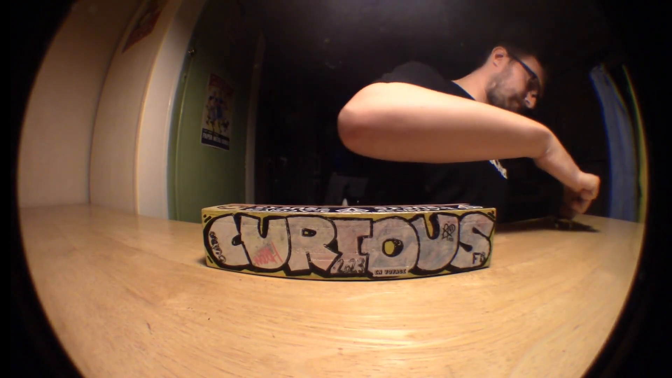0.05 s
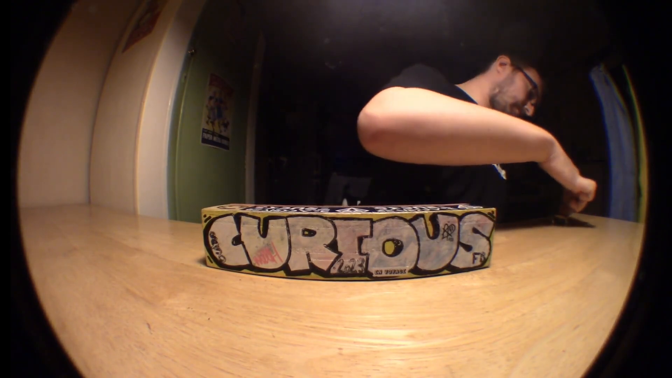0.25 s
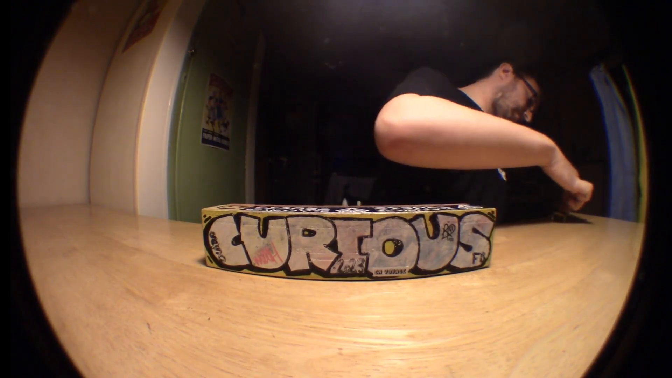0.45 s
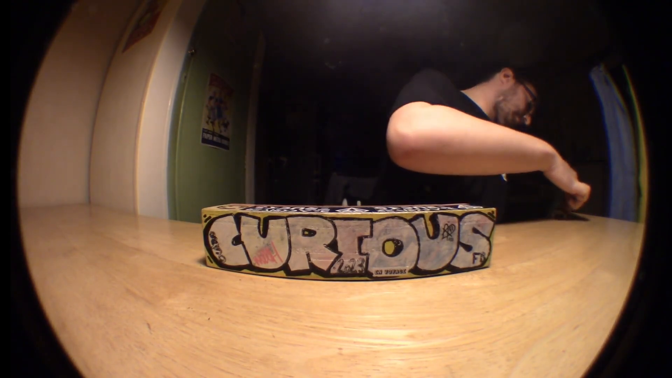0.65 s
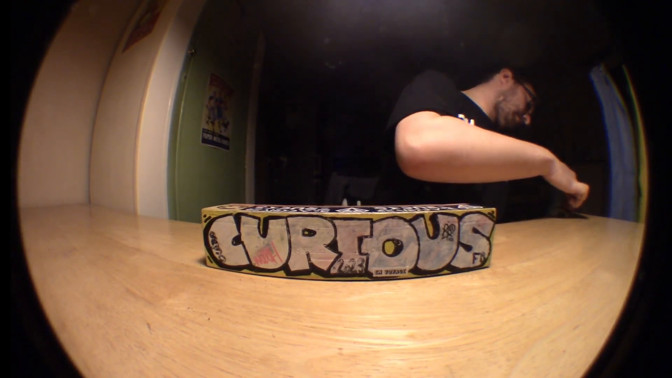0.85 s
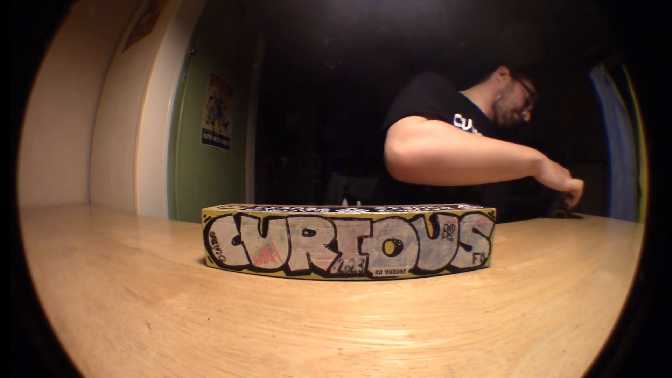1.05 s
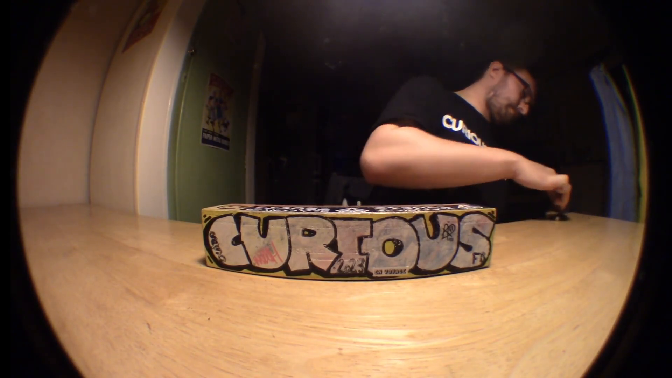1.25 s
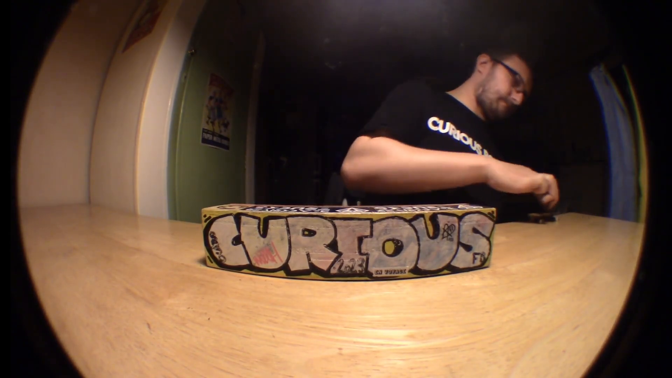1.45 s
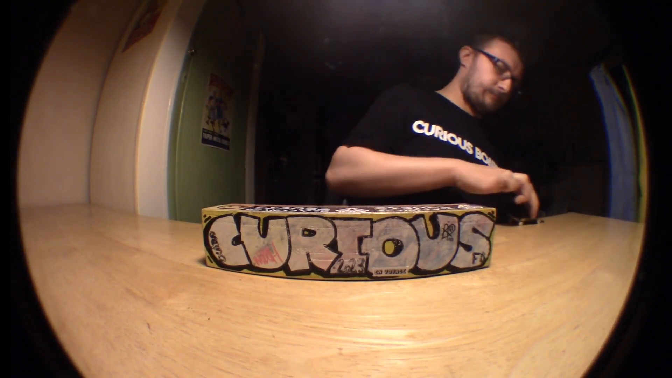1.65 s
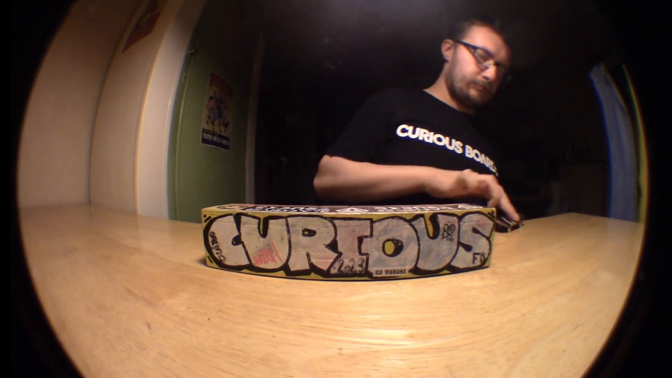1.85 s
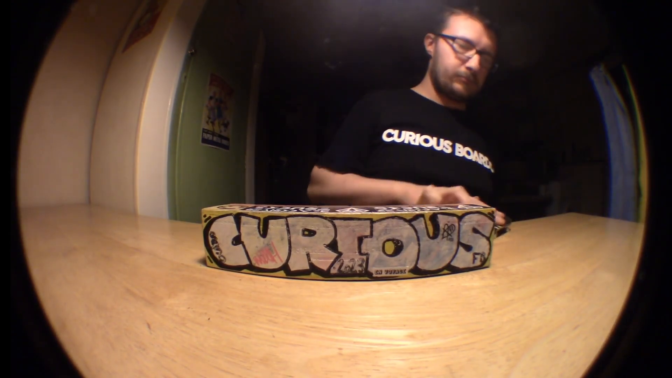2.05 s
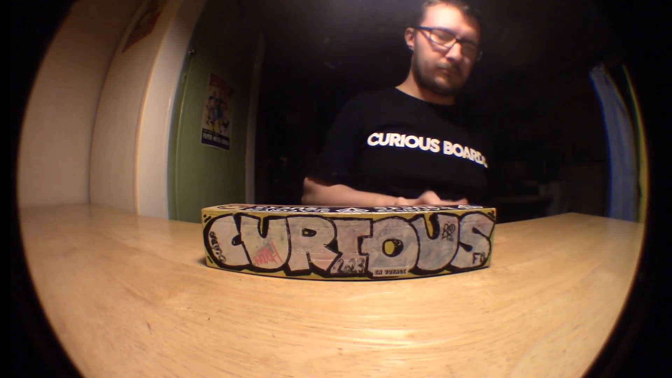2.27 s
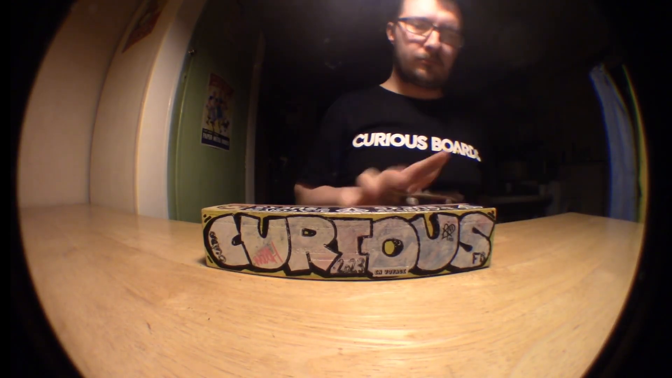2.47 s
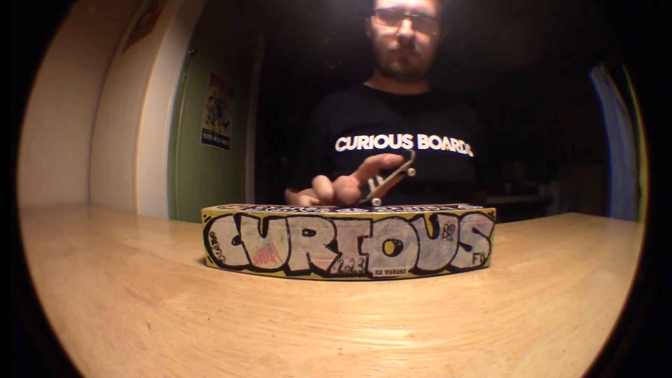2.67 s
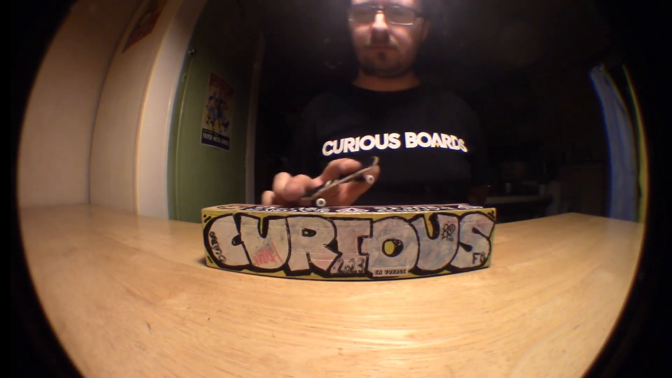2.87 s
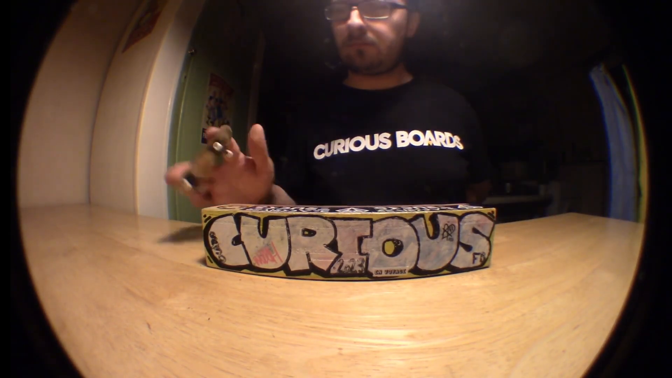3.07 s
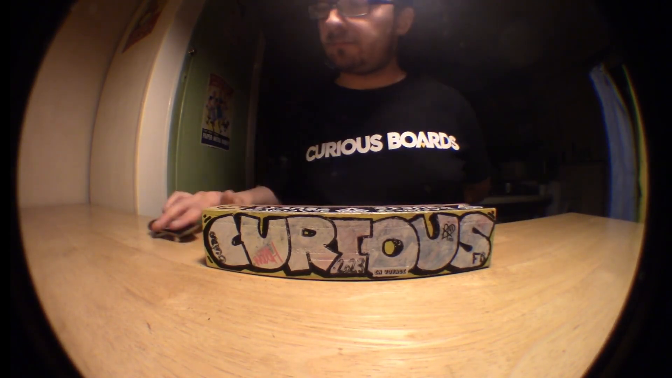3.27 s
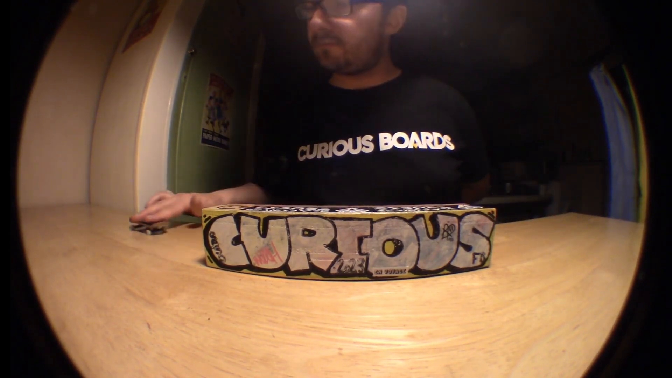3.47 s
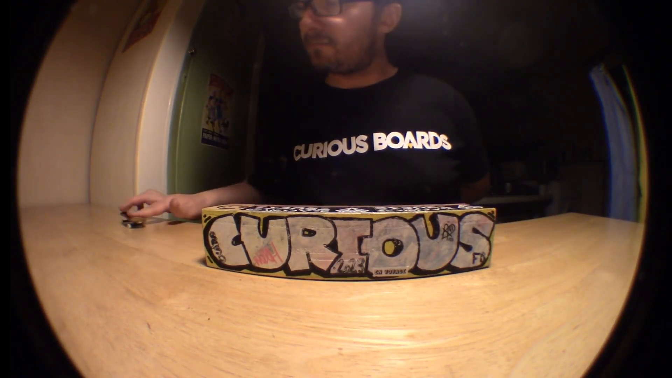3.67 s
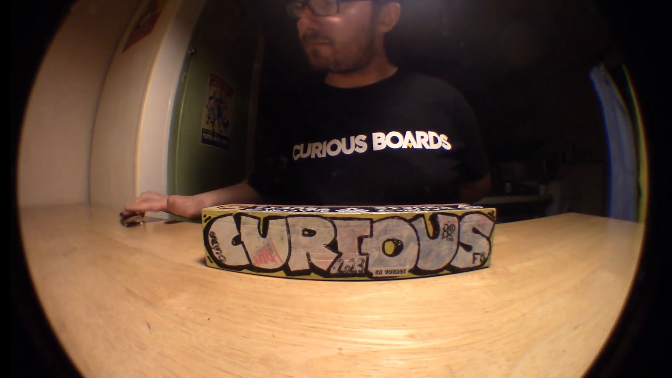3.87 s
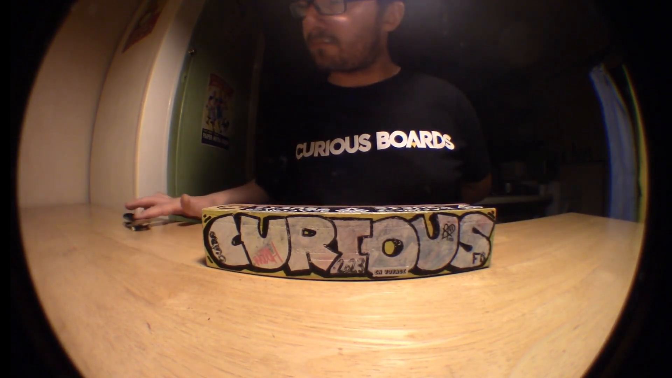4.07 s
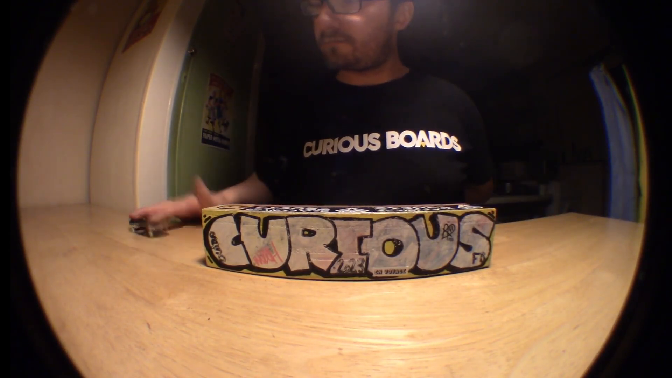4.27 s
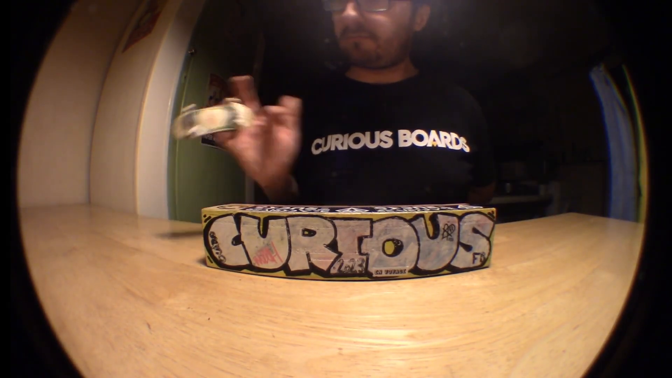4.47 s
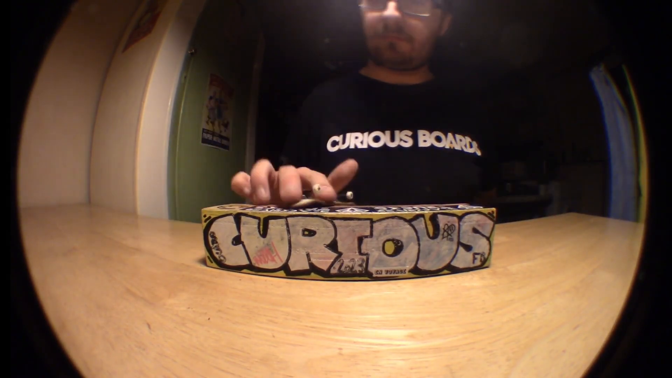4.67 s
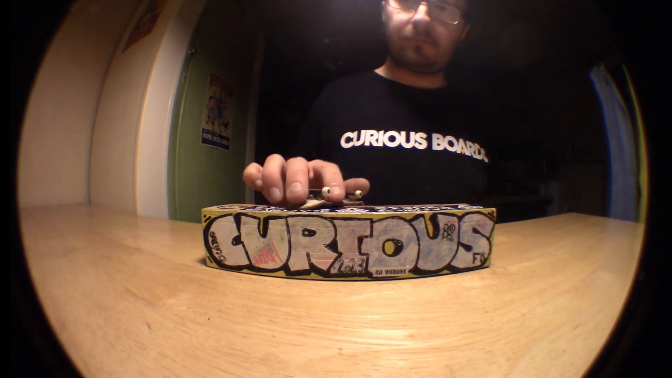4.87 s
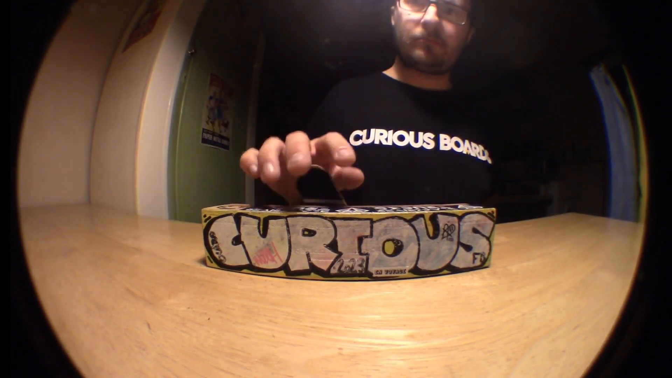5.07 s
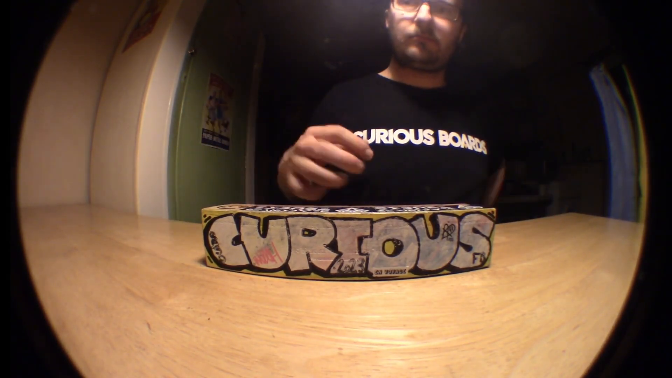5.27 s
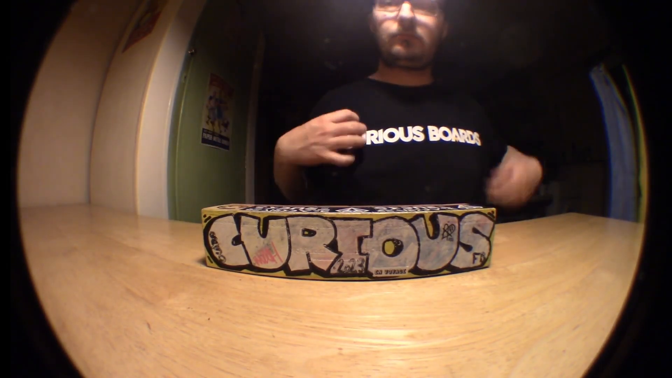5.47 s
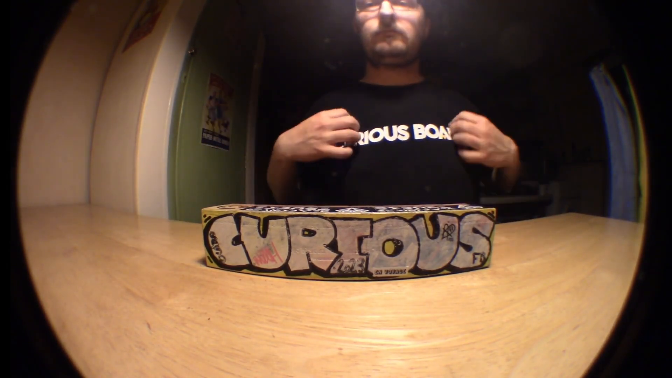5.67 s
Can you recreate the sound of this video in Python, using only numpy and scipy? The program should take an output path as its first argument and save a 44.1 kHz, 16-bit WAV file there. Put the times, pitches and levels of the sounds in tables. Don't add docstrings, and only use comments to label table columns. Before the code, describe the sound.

In a small quiet room, a finger-sized skateboard rolls across a wooden table with a low, lumpy rumble and fine wheel hiss. It pops sharply, its metal axles chatter and scrape along a hollow box, and it clacks down loudly. After brief rolling comes a second pop, a short scrape, then a drop and clattering tumble. Close camera microphone, nearly mono, loud peaks slightly clipped.

```python
import sys
import numpy as np
from scipy import signal
from scipy.fft import rfft, irfft, next_fast_len
from scipy.io import wavfile
from scipy.ndimage import map_coordinates

SR = 44100
rng = np.random.default_rng(int(sys.argv[2]) if len(sys.argv) > 2 else 0)


def nominal_scale(level):
    x = np.asarray(level, float) / 20
    return 10 ** x


def wrap_up_sound(samples):
    columns = np.atleast_2d(samples).T
    tamed = np.clip(columns, -1, 1)
    steps = np.round(tamed * 32767).astype(np.int16)
    wavfile.write(sys.argv[1], SR, steps)


N = 252693

# pitch_hz, width_hz, level_db
TABLE = [(160, 45, -6.5), (225, 114, -12.5), (330, 20, -4.5), (423, 31, -7), (506.4, 13.3, 2.5),
         (603, 8.6, -3.5), (730, 91, -8.5), (808, 17, 4)]
# pitch_hz, width_hz, level_db
BEARINGS = [(2680, 300, -5), (3945, 467, 6), (4750, 1120, -1), (5490, 560, -4), (6820, 990, -17.5),
            (7830, 720, -15)]
# pitch_hz, width_hz, level_db
BOX = [(1039, 295, -5), (1239, 44, 11.5), (1384, 230, -0.5)]
# pitch_hz, width_hz, level_db
DECK = [(1660, 55, 8), (1838, 22, 2), (2057, 36, 0), (2685, 165, 3), (3155, 66, 3.5)]
# pitch_hz, width_hz, level_db
STEEL = [(3813, 225, 1), (4100, 149, 1), (4545, 170, -2), (5290, 190, -10), (6610, 100, -13),
         (7800, 1030, -20), (8300, 5900, -37.5), (11500, 2100, -47.5)]
# pitch_hz, width_hz, level_db
SNAP = [(5760, 460, -0.5), (6930, 230, -11.5), (6750, 1400, -11), (9200, 1400, -37.5), (12860, 3100, -19.5)]


def unit(x):
    return x / np.sqrt(np.mean(x ** 2) + 1e-20)


def along(points, hz):
    f, v = np.transpose(points)
    return np.interp(np.log(hz + 1), np.log(f + 1), v)


def filtered(x, response):
    m = next_fast_len(x.shape[-1] + 8192)
    spectrum = rfft(x, m) * response(np.fft.rfftfreq(m, 1 / SR))
    return irfft(spectrum, m)[..., :x.shape[-1]]


def body(modes):
    def response(f):
        total = 0
        for k, (hz, width_hz, db) in enumerate(modes):
            damped = 1j * f * width_hz
            total = total + (-1) ** k * nominal_scale(db) * damped / (hz * hz - f * f + damped)
        return total
    return response


def causal(gain):
    cepstrum = irfft(np.log(gain + 1e-6))
    half = len(cepstrum) // 2
    return np.exp(rfft(np.r_[cepstrum[0], 2 * cepstrum[1:half], np.zeros(half)]))


def gains(spans, fade_s):
    t, out = np.arange(N) / SR, 0
    for rows in spans:
        s, *columns = np.transpose(rows)
        edge = np.clip(np.minimum(t - s[0], s[-1] - t) / fade_s + 1, 0, 1)
        out = out + edge * nominal_scale(np.array([np.interp(t, s, db) for db in columns]))
    return out


def wobble(rate_hz):
    knots = rng.standard_normal(int(N * rate_hz / SR) + 4)
    return map_coordinates(knots, [np.arange(N) * rate_hz / SR])


def grit(per_s, spread_db, smooth):
    chance, sign, size = rng.random((3, N))
    knocks = (chance < per_s / SR) * np.sign(sign - 0.5) * nominal_scale(-spread_db * np.log(size + 1e-3))
    return unit(knocks) + smooth * rng.standard_normal(N)


def rubbed(force, places, layer, colour, lo_hz, hi_hz, broad_db):
    out, fade = np.zeros(N), 2000

    def band(f, steep):
        return 1 / np.sqrt((1 + (lo_hz / (f + 1)) ** steep) * (1 + (f / hi_hz) ** steep))

    for (start_s, end_s), *modes in places:
        def response(f):
            ringing = body(modes[layer])(f) * band(1.64 * f, 3.3)
            return ringing + nominal_scale(along(colour, f) + broad_db) * band(f, 9)

        a, b = max(round(start_s * SR) - fade, 0), round(end_s * SR) + fade
        n = np.arange(a, b)
        to_edge = np.minimum(n - a + (a == 0) * N, b - n)
        out[a:b] += unit(filtered(force[a:b], response)) * np.sqrt(np.clip(to_edge / (2 * fade), 0, 1))
    return out


def roll():
    # start_s, wheel_load_db, speed_db (extra brightness)
    pushes = [
        [(0.0, -25.5, -5.5), (0.04, -32, -0.5), (0.086, -25, 1.5), (0.142, -36, 5), (0.2, -34.5, 1.5),
         (0.36, -37.5, 3), (0.752, -35.5, 0), (0.875, -35, 1), (0.935, -50, -21)],
        [(0.95, -57, -21), (1.01, -45, -14), (1.05, -42.5, -2), (1.108, -35.5, -1.5), (1.37, -31.5, 0),
         (1.395, -31.5, 7), (1.53, -33.5, 5), (1.62, -29.5, 3)],
        [(1.636, -27, 2), (1.7, -25, 1), (1.76, -23.5, 2), (1.815, -19, 2.5), (1.88, -24.5, 0),
         (1.955, -25.5, -1), (1.99, -33.5, -2), (2.05, -31, -2), (2.1, -35.5, 1.5)],
        [(2.12, -30.5, 2.6), (2.184, -27, 1.8), (2.22, -30.5, 6.6), (2.27, -31.5, 18), (2.335, -32.5, 0.3)],
        [(3.3, -10.5, -8), (3.325, -11.5, 15), (3.36, -17.5, 16), (3.41, -24.5, 8), (3.464, -27, 3),
         (3.732, -28.5, 0), (3.814, -37.5, 1), (3.876, -63, 5)],
        [(3.896, -34, -9), (3.918, -45, -4), (3.95, -36.5, -9), (4.116, -31, -6.5), (4.21, -25, 4),
         (4.276, -25.5, 2.5), (4.308, -33, -16), (4.335, -43, 23)],
    ]
    deck_buzz_db = [-10.5, -7.5, -11.5, -12, -7.5, -3.5]
    # pitch_hz, width_hz, level_db
    roll_places = [
        ((0, 0.54), [(188, 41, -9.5), (317, 114, -3), (437, 290, -5), (563, 20, 2), (723, 37, -19), (962, 13, -1.5)], [(1173, 130, 6), (1412, 16, 3), (2150, 77, -20)], BEARINGS),
        ((0.583, 1.365), [(189.6, 15, -3.5), (269, 104, -4), (440, 82, -5), (522, 29, 4.5), (749, 38, 7)], [(1000, 260, 6), (1420, 300, -14)], BEARINGS),
        ((1.4, 1.564), [(273, 40, -7.5), (443, 41, -13), (515, 24, 3.5), (756, 36, 1)], [(1080, 190, 0), (1520, 230, 6), (1900, 400, -3)], [(2780, 570, 1.5)] + BEARINGS[1:]),
        ((1.58, 2.4), [(198.5, 35, -23), (426, 55, -7), (522.7, 20.7, -1.5), (718, 43, -4), (798.5, 6, 8.5)], [(1010, 160, -5.5), (1820, 44, 1), (2160, 22, -2)], [(2710, 260, 7.0), (3170, 250, 9.0)] + BEARINGS[1:]),
        ((3.2, 3.52), [(327, 144, -11.5), (522, 103, 1), (630, 110, -1.5), (809, 47, 3)], [(1216, 24, -16), (1630, 98, -0.5), (1816, 54, -5.5), (2205, 74, 2)], [(2710, 160, 1), (3830, 300, 0), (4070, 400, -3.5), (4600, 270, 2)] + BEARINGS[3:]),
        ((3.52, 4.4), [(325, 110, -2), (401, 21, 0.5), (537, 46, 7), (660, 40, 8), (759, 46, 10.5)], [(1246, 11.6, -0.5), (1440, 33, -1), (1795, 110, -14.5)], BEARINGS),
    ]
    # pitch_hz, level_db
    wheel_colour = [(35, -52), (124, -38), (469, -3), (1470, -12.5), (2350, -16.5), (4120, -6), (5860, -47),
                    (16000, -80.5)]
    buzz_per_speed, hiss_db = 0.54, -10
    layers = [[(s, load, load + buzz + buzz_per_speed * speed, load + hiss_db + speed)
               for s, load, speed in push] for push, buzz in zip(pushes, deck_buzz_db)]
    hum, buzz, hiss = gains(layers, 0.014)
    lumps_db = 1.5 * wobble(60) + 0.28 * wobble(26.74)
    hiss_lumps_db = 0.69 * lumps_db + 0.16 * wobble(64)
    coarse = grit(1000, 2.7, 1.0)
    fine = grit(3000, 2.5, 1.2)
    table = rubbed(coarse, roll_places, 0, wheel_colour, 220, 1000, -13)
    deck = rubbed(coarse, roll_places, 1, wheel_colour, 1160, 2360, -3)
    bearings = rubbed(fine, roll_places, 2, wheel_colour, 2300, 20000, -1.8)
    out = hum * nominal_scale(lumps_db - 0.6) * table
    out = out + buzz * nominal_scale(0.9 * lumps_db - 1.5) * deck
    return out + hiss * nominal_scale(hiss_lumps_db - 5.5) * bearings


def grind():
    # start_s, axle_pressure_db, shell_grip_db
    slides = [
        [(2.54, -35, -28), (2.546, -20.5, -26), (2.575, -13.5, -6.5), (2.635, -14, -10), (2.652, -28, -6.5),
         (2.74, -26, -4.5), (2.775, -19.5, -5), (2.8, -11.5, -8.5), (2.814, -25, -9.5)],
        [(2.825, -23.5, -5), (2.846, -14, -2.5), (2.91, -14, -4), (2.935, -20, -0.5), (2.96, -12, -7.5),
         (3.024, -9.5, -12), (3.054, -8, 0.5), (3.08, -23.5, -23)],
        [(4.675, -49.5, 31), (4.705, -15, -7), (4.765, -11, 2), (4.775, -20, -21)],
    ]
    # start_db, slope_db_per_s
    booms = [(1, -35.5), (-2.5, -29), (3, -30)]
    # pitch_hz, width_hz, level_db
    grind_places = [
        ((2.45, 2.8), [(160, 39, -5), (430, 42, -1), (808, 26, 3.5)], BOX + [(1670, 120, -6), (1900, 180, -11), (2240, 80, -2)], [(2480, 110, 3), (2650, 130, -2), (2830, 90, -6.5), (3450, 460, -5), (4160, 120, 3), (4380, 79, -1), (5140, 130, -7.5)] + STEEL[4:]),
        ((2.8, 3.15), [(160, 19, -2), (344, 50, -1.5), (484, 92, -3), (830, 76, -8)], BOX + DECK[:3], DECK[3:] + STEEL),
        ((4.6, 4.85), TABLE, BOX + DECK[:3], [(2210, 110, 2), (2780, 220, 3), (3190, 180, 7), (4150, 1800, 2.5), (5140, 1200, -2.5), (6930, 870, -39)]),
    ]
    # pitch_hz, level_db
    axle_colour = [(60, -23), (458, -8), (1280, -6.5), (2090, -27.5), (2520, -0.5), (4750, -5.5),
                   (8510, -16.5), (16000, -46)]
    layers = [[(s, press + start + slope * (s - slide[0][0]), press + grip, press)
               for s, press, grip in slide] for slide, (start, slope) in zip(slides, booms)]
    boom, ring, rasp = gains(layers, 0.003)
    force = grit(1300, 3, 0.55) * nominal_scale(2.5 * wobble(150) + 1.0 * wobble(40))
    out = boom * nominal_scale(-4.5) * rubbed(force, grind_places, 0, axle_colour, 110, 1200, -15.5)
    out = out + ring * nominal_scale(-4.5) * rubbed(force, grind_places, 1, axle_colour, 1100, 2200, -14.5)
    return out + rasp * nominal_scale(-6.0) * rubbed(force, grind_places, 2, axle_colour, 1500, 20000, -11)


def box_knocks():
    # start_s, steel_click_db, table_thud_db, box_shell_db, deck_db (peaks)
    knocks = [(2.5196, 5, -22, -8, -5), (2.528, -7, -10, -2.5, -11), (2.5706, -5, -14.5, -30, 0),
              (2.5886, -11.5, -22, -15, -22), (2.596, -1.5, -15.5, -6, -5.5),
              (2.6105, -9.5, -4, -7.5, -15.5), (2.6224, -30, -22.5, -20, -29),
              (2.6306, -13, -24, -6.5, -12), (2.641, -8, -22.5, -9, -14.5), (2.6653, -26, -29, -29, -29),
              (2.7602, -26, -15, -7, -15), (2.7788, -19, -15, -18, -6), (2.7935, -16, -17, -3.5, -16),
              (2.8005, -7.5, -13, -16, -16), (2.829, -9, -11.5, -8.5, -25), (2.838, -18, -17.5, -10.5, -19),
              (2.8455, -9.5, -18, -13, -13), (2.8535, -16, -16, -6.5, -17), (2.878, -23, -28, -2.5, -21),
              (2.886, -21, -18, -10.5, -18), (2.902, -0.5, -26.5, -6, -7), (2.9215, -2.5, -16.5, -4, -6.5),
              (2.9454, -23, -23, -18.5, -15.5), (2.9658, -4.5, -19.5, -12, -15), (2.978, -5, -28, -17, -16),
              (2.992, -13, -18, -16.5, -4.5), (2.9993, 3, -27.5, -18, -23), (3.008, -20, -19.5, -27, -22),
              (3.016, -11.5, -29, -22, -26.5), (3.0215, 6.5, -21, -19, -23), (3.037, -3, -24.5, -8.5, -6),
              (3.048, -10, -28.5, -3, -22), (3.055, -7, -13, -1.5, -22.5), (3.064, 4, -44, -31, -30)]
    knocks_back = [
        (4.6496, -1.5, -9.5, 4, 2.5),
        (4.6656, -5, -12, -3, -4.5),
        (4.6965, -5, -10.5, -18, -5),
        (4.7083, -28, -7.5, -29, -23),
        (4.727, -12, -18, -1, -5),
        (4.735, -15, -31, -16, -26),
        (4.7525, -6.5, -15.5, -19.5, -14),
        (4.7586, -7.5, -21, -17, -13),
        (4.7653, -16, -21.5, -12.5, -18),
    ]

    def against_click(rows, room_db):
        return [(s, click, *np.subtract(rest, click), room_db) for s, click, *rest in rows]

    out = strikes(against_click(knocks, -4.15),
                  [(STEEL[1:], 0.8, 0.1), (TABLE[5:], 3.5, -4), (BOX, 1.2, -12), (DECK[2:], 1.3, -2.5)], 0.0035)
    return out + strikes(against_click(knocks_back, -0.2),
                         [(STEEL, 2.6, 0.1), (TABLE[3:], 3, -2), (BOX, 1.1, -9), (DECK, 3, -2.5)], 0.0015)


def tail_pops():
    # table_thud_db, deck_db, snap_db
    pops = [
        (2.3521, -1.5, -5.5, -13, 2),
        (4.356, -8, -1, -2.5, 5.5),
    ]
    parts = [(STEEL[:3], 2.4, -0.1), (TABLE[2:], 6, -1.5), (DECK[:3], 3.6, -1.5), (SNAP, 0.8, 0.1)]
    return strikes([(*pop, 2) for pop in pops], parts, 0.005)


def landings():
    # table_thud_db, deck_db
    hits = [
        (3.2598, -5.5, -6.5, 3.5),
        (3.264, -2, -7.5, 3.5),
        (3.2828, -1, -6.5, 0),
    ]
    parts = [(STEEL[:3], 2.4, -0.1), (TABLE[2:], 3.4, 0.1), (DECK[1:], 3, -0.1), (SNAP, 1.1, 0.1)]
    return strikes([(*hit, -2, -1) for hit in hits], parts, 0.002)


def drop():
    # table_thud_db, deck_db, tick_db, room_db
    hits = [
        (5.1112, -9, 3, 13, 1, -2),
    ]
    parts = [(STEEL[:3], 2.4, -16), (TABLE[2:], 3, 2.5), (BOX[2:] + DECK[1:], 4, -0.1), (SNAP, 3.4, -26)]
    return strikes(hits, parts, 0.0037)


def tumbles():
    # table_thud_db, deck_db
    hits = [
        (5.232, -13, -11, 1),
        (5.2796, 1.5, -16.5, -3.5),
        (5.284, 1.5, -8, -4.5),
        (5.2966, -9.5, -6, -0.5),
        (5.340, -7, -24, -8),
        (5.3679, -1, -11, -6.5),
        (5.4075, -8.5, -17.5, 1.5),
    ]
    parts = [(STEEL[:3], 2.4, -0.1), (TABLE[2:], 2.4, 3), (BOX[2:] + DECK, 5, 2.5), (SNAP, 1.1, 0.1)]
    return strikes([(*hit, -4.5, -5) for hit in hits], parts, 0.0015)


def wheel_bumps():
    # start_s, steel_click_peak_db, table_thud_db (against the click)
    bumps = [(0.714, -51, 19), (0.776, -50.5, 23.5), (1.024, -55, 22), (1.110, -49, 19), (1.1345, -48, 19),
             (1.415, -39.5, 21.5), (1.5555, -24, 9.5), (1.797, -26, -1), (2.0233, -30.5, 9),
             (2.2596, -25, 5.5), (3.7209, -53, 10), (3.8903, -49, 18), (3.9544, -38.5, 2), (3.984, -37, -2),
             (4.0662, -34, -4), (4.3459, -20, 0), (4.999, -43.5, -15)]
    parts = [(STEEL[:3], 1.8, -0.1), (TABLE[3:], 1.6, 0.1), (DECK, 2.6, -0.1)]
    return strikes([(*bump, 1, -7) for bump in bumps], parts, 0.005)


def strikes(events, parts, push_s):
    pitch_scatter, level_scatter_db = 0.025, 2.0
    room_blur = 1.7
    out, size, tails = np.zeros(N + SR), 2048, rooms(count=11)
    t, f = np.arange(size) / SR, np.fft.rfftfreq(2 * size, 1 / SR)
    for k, (s, db, *levels, room_db) in enumerate(events):
        rough = 2.84 * (t == 0) + rng.standard_normal(size)
        push = rfft(rough * nominal_scale(-60 * t / push_s), 2 * size)
        hit, power = 0, 0
        for (modes, damping, far_db), level_db in zip(parts, [0] + levels):
            struck = [(hz * (1 + pitch_scatter * rng.standard_normal()), width * damping,
                       g + level_scatter_db * rng.standard_normal()) for hz, width, g in modes]
            soft = 1 / (1 + 1j * f / (0.98 * modes[-1][0])) ** 3
            low_hz = 0.65 * modes[0][0]
            soft = soft * (1j * f / (low_hz + 1j * f)) ** 2
            part = irfft(push * soft * body(struck)(f))[:size]
            part = nominal_scale(level_db) * part / np.abs(part).max()
            hit = hit + part
            even = sum(np.abs(soft * body([(hz, room_blur * width, g)])(f)) ** 2 for hz, width, g in struck)
            power = power + nominal_scale(far_db) ** 2 * even * np.sum(part ** 2) / np.mean(even)
        colour = irfft(causal(np.sqrt(power)))[:size]
        echo = signal.fftconvolve(colour, tails[k % len(tails)])
        at = round(s * SR)
        out[at:at + size] += nominal_scale(db) * hit
        out[at:at + len(echo)] += nominal_scale(db + room_db) * echo
    return out[:N]


def thumps():
    # start_s, level_db, pitch_hz, t60_s
    touches = [(2.579, -20, 109, 0.24), (2.902, -21.5, 153, 0.48), (3.266, -21, 92.3, 0.12),
               (3.998, -15.5, 107, 0.074), (3.33, -28.5, 160, 0.41), (4.361, -19, 88, 0.09),
               (4.652, -16.5, 86, 0.082), (4.652, -30, 35, 0.08), (4.961, -20.5, 128, 0.074),
               (5.112, -24, 120, 0.13), (5.285, -20.5, 207, 0.41), (5.293, -31, 100, 0.38)]
    out, t = np.zeros(N + SR), np.arange(SR // 2) / SR
    for s, db, hz, t60_s in touches:
        mode = body([(hz, 0.45 * hz, 0)])
        shake = unit(filtered(rng.standard_normal(len(t)), lambda f: mode(f) ** 2))
        swell = 1 - np.exp(-t / 0.022)
        out[round(s * SR):][:len(t)] += nominal_scale(db - 60 * t / t60_s) * swell * shake
    return out[:N]


def rooms(count):
    # pitch_hz, level_db
    wall_colour = [(60, 3.5), (300, 1.5), (1500, 0), (5000, -4.5), (15000, -2.5)]
    # pitch_hz, t60_s
    decay = [(100, 0.55), (500, 0.35), (2000, 0.39), (5000, 0.36), (9000, 0.28), (14000, 0.23)]
    length = SR // 2
    hz, t, z = signal.stft(rng.standard_normal((count, length)), SR, nperseg=256)
    fall_db = along(wall_colour, hz)[:, None] - 60 * t / along(decay, hz)[:, None]
    tails = signal.istft(z * nominal_scale(fall_db), SR, nperseg=256)[1][:, :length]
    tails = tails * (1 - np.exp(-np.arange(length) / (0.0013 * SR)))
    return tails / np.linalg.norm(tails, axis=1, keepdims=True)


def echoed(x):
    out, step, tails = np.zeros(N + SR), 16384, rooms(count=6)
    for k, at in enumerate(range(0, N, step)):
        piece = signal.fftconvolve(x[at:at + step], tails[k % len(tails)])
        out[at:at + len(piece)] += piece
    return out[:N]


def room_air():
    # pitch_hz, level_db
    air_colour = [(25, -18), (95, 0.5), (180, 14.5), (700, 2.5), (2500, -9), (5500, -10.5), (9000, -21.5),
                  (16500, -31.5)]
    return nominal_scale(-50) * unit(filtered(rng.standard_normal(N), lambda f: nominal_scale(along(air_colour, f))))


def microphone(x):
    # pitch_hz, level_db
    mic_response = [(20, -8), (60, 0), (85, -2.5), (10000, 1), (13000, -7), (15000, -13), (16500, -36)]
    return filtered(x, lambda f: causal(nominal_scale(along(mic_response, f))))


def two_ports(mid):
    # pitch_hz, side_minus_mid_db
    port_difference = [(60, -12.5), (200, -20.5), (380, -23), (1290, -19), (2380, -18), (4400, -20),
                       (8120, -9), (15000, -14)]
    hz, _, z = signal.stft(mid, SR, nperseg=256)
    z = z * nominal_scale(along(port_difference, hz) + 3.0)[:, None] * np.exp(2j * np.pi * rng.random(z.shape))
    side = signal.istft(z, SR, nperseg=256)[1][:N]
    side = filtered(side, lambda f: f * f / (f * f + 130 ** 2))
    return np.array([mid + side, mid - side])


def scene():
    wheels = filtered(roll(), lambda f: (1j * f / (70 + 1j * f)) ** 3)
    slide = grind()
    board = wheels + nominal_scale(2.0) * slide + echoed(nominal_scale(-7.0) * wheels + nominal_scale(-10.0) * slide)
    contacts = box_knocks() + tail_pops() + landings() + drop() + tumbles() + wheel_bumps()
    return two_ports(microphone(board + contacts) + thumps() + room_air())


def top_cut(x):
    return signal.sosfilt(signal.butter(12, 16720, fs=SR, output="sos"), x)


def record(dry):
    keep = np.exp(-1 / (0.052 * SR))
    loudness = signal.lfilter([1 - keep], [1, -keep], np.mean(dry ** 2, axis=0))
    ducked = dry / (1 + loudness / 0.29 ** 2) ** 0.37
    clipped = ducked / (1 + np.abs(ducked / 0.95) ** 8) ** (1 / 8)
    smooth = filtered(clipped, lambda f: (f < 16570) / (1 + (f / 15500) ** 16))
    return top_cut(smooth)


dry = scene()
out = record(dry)
wrap_up_sound(out)
```